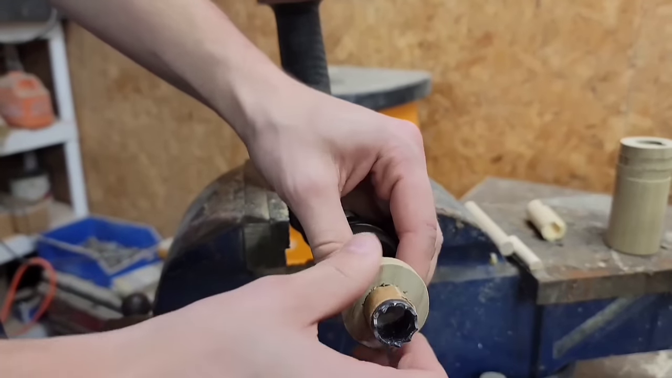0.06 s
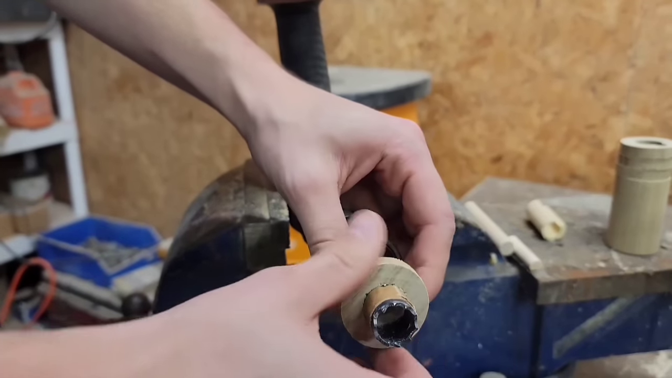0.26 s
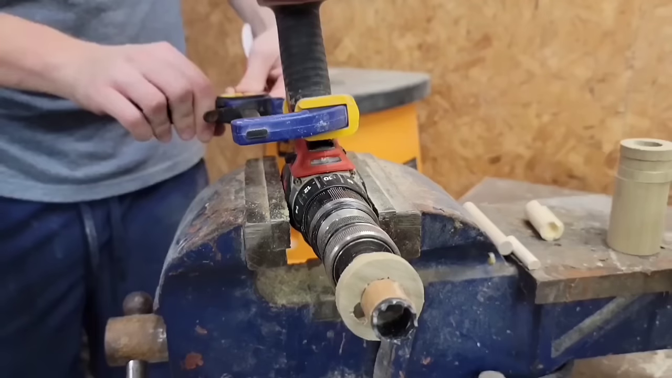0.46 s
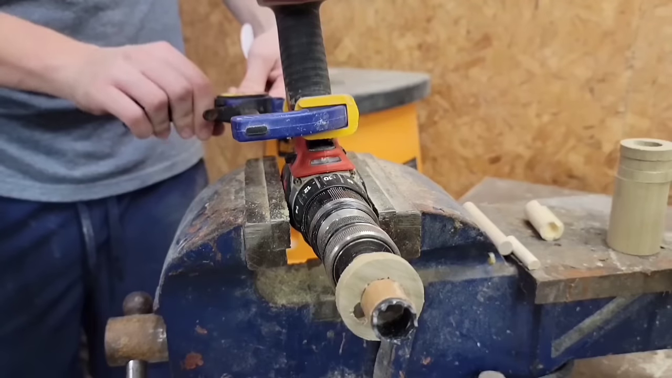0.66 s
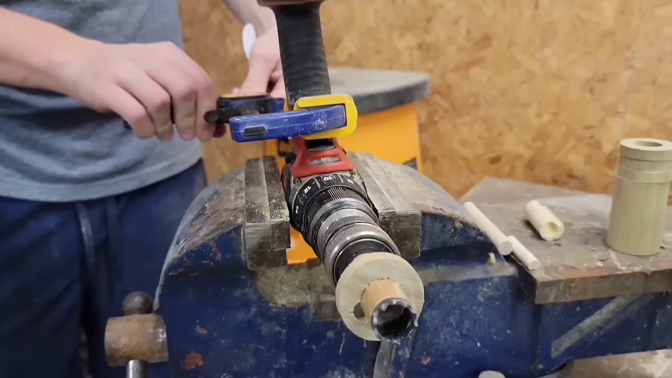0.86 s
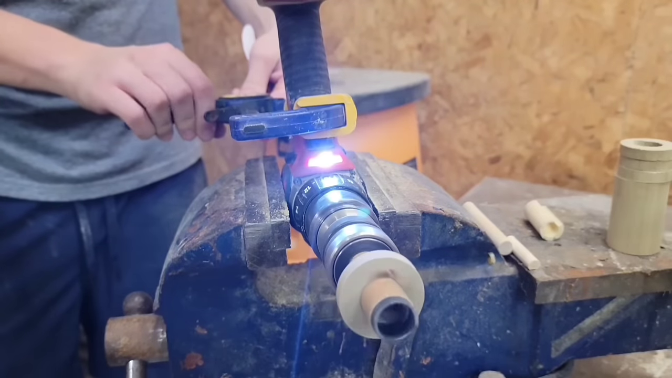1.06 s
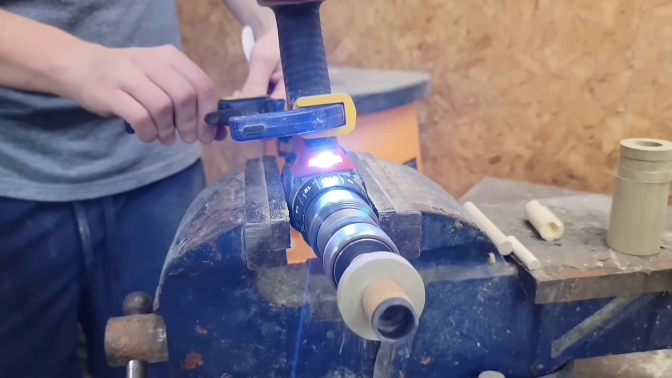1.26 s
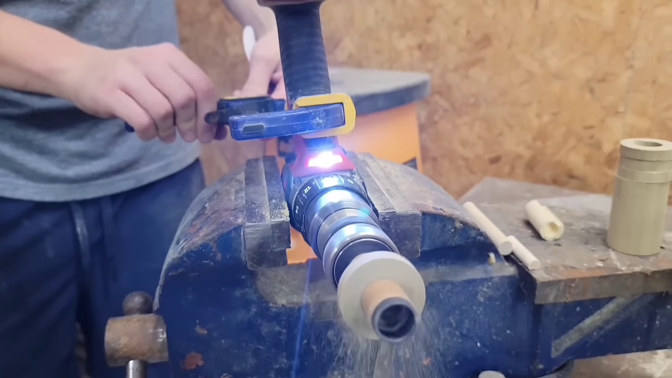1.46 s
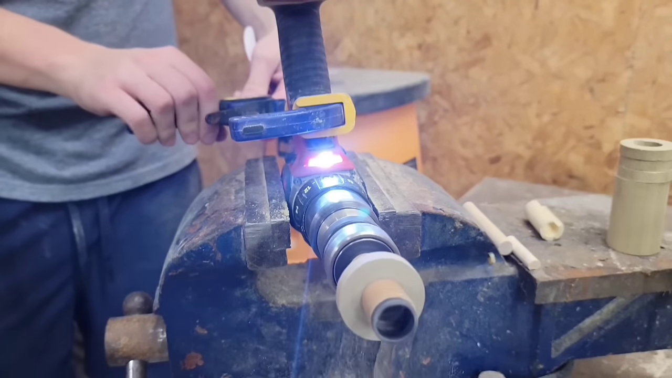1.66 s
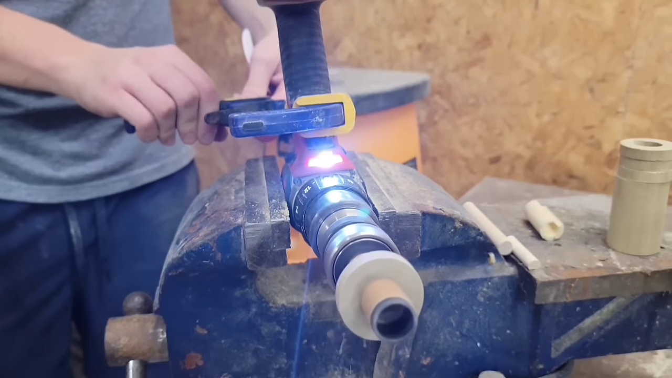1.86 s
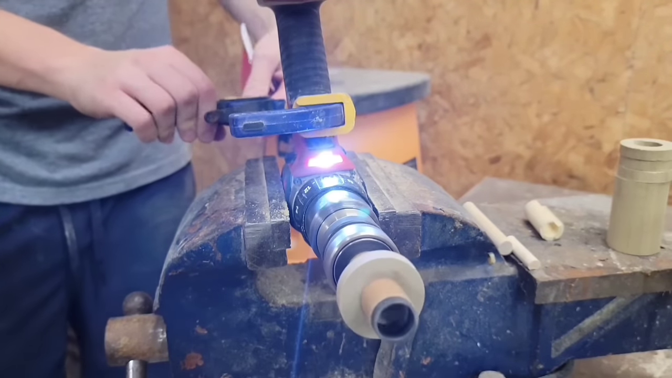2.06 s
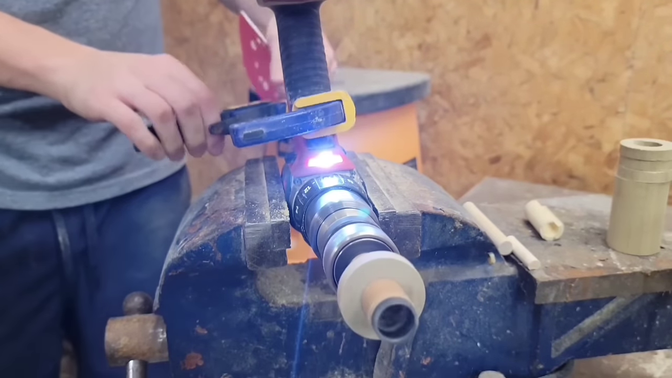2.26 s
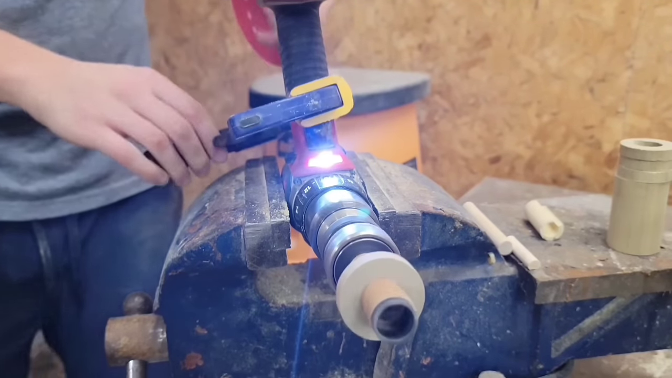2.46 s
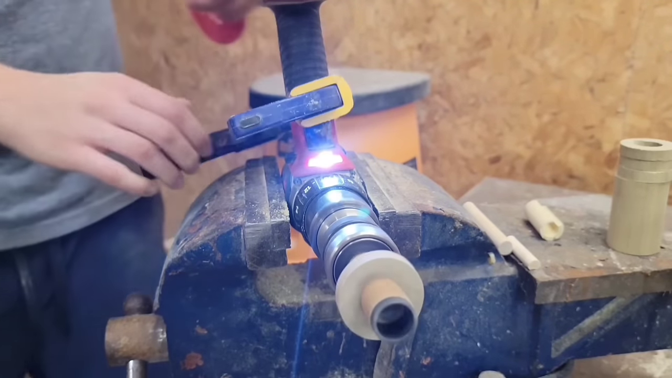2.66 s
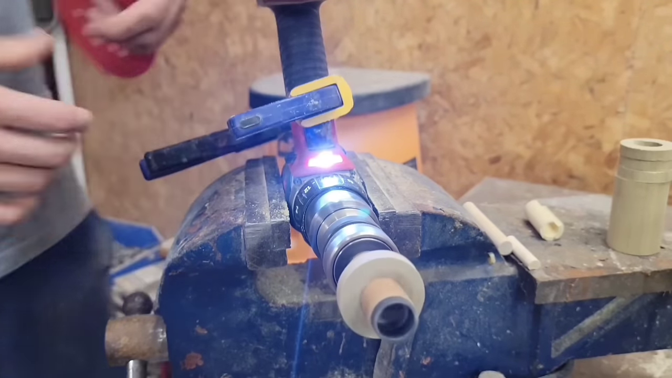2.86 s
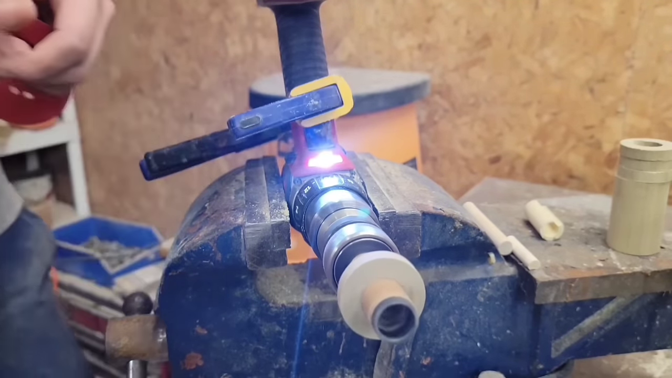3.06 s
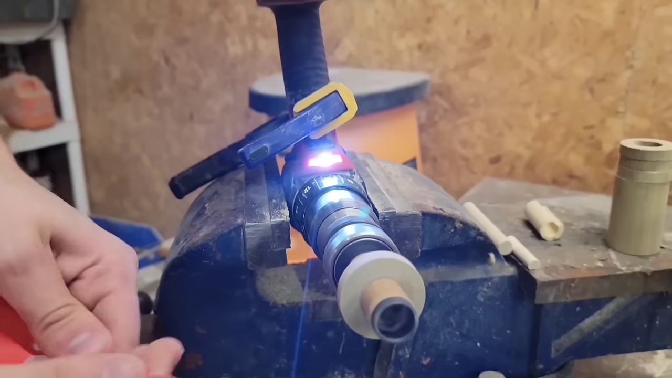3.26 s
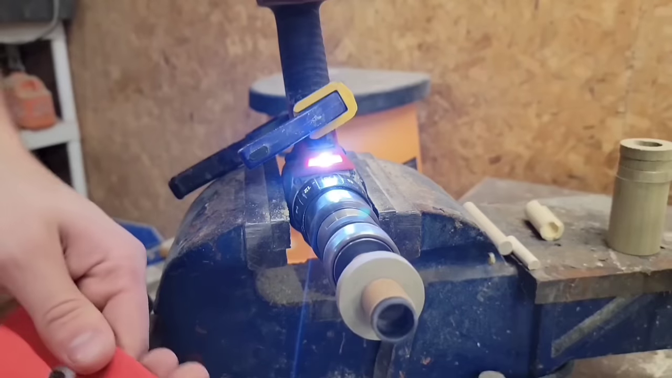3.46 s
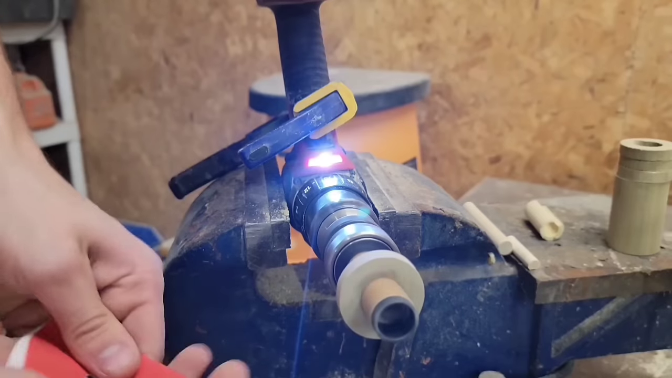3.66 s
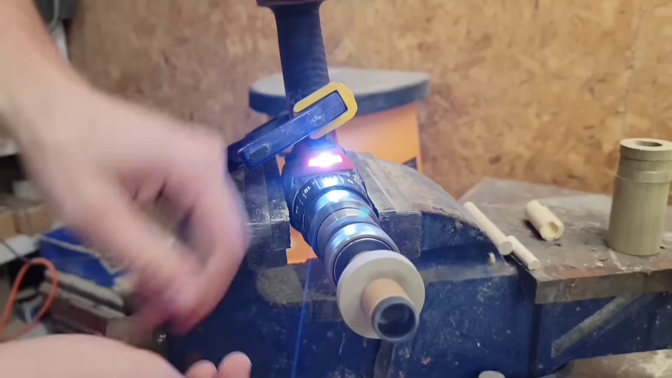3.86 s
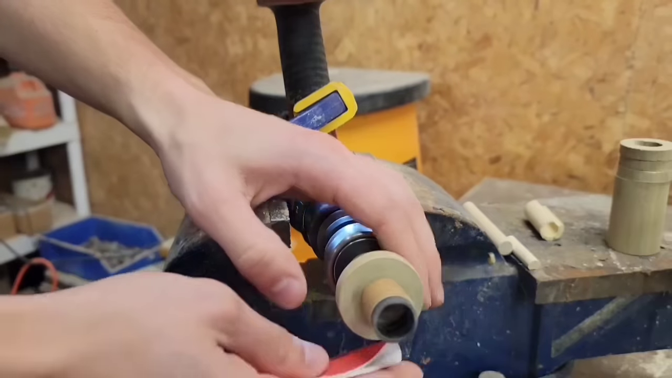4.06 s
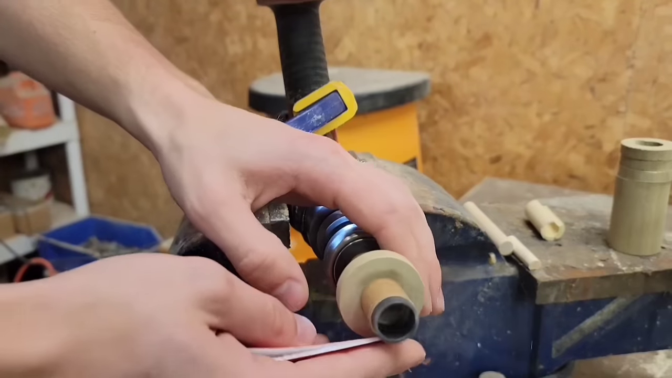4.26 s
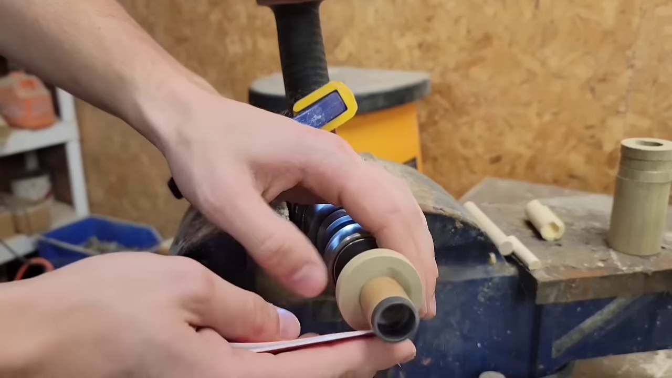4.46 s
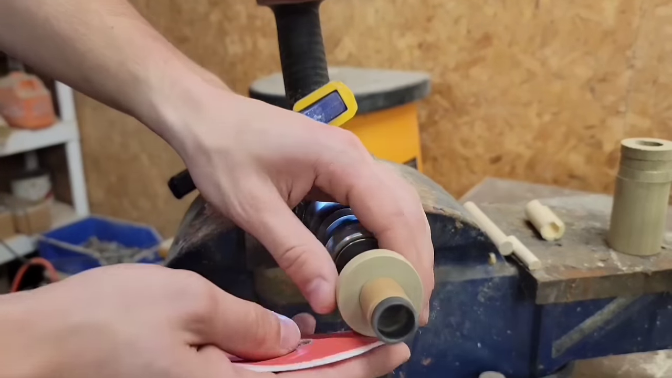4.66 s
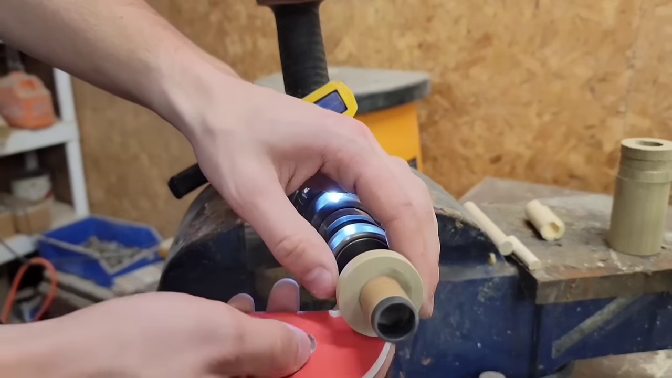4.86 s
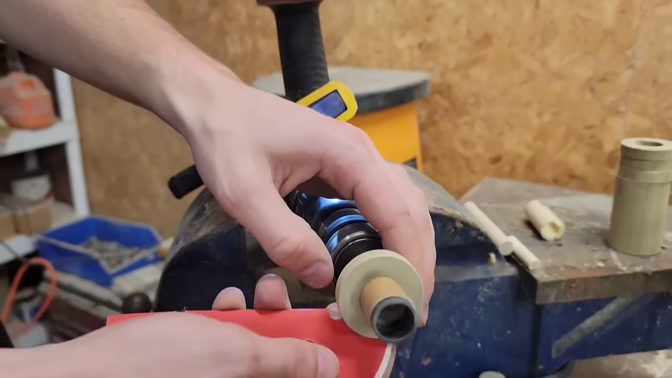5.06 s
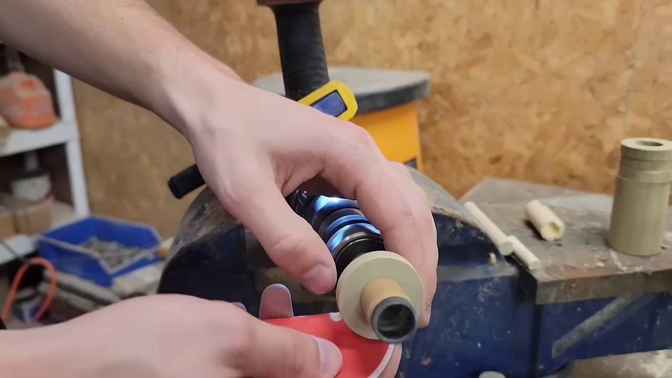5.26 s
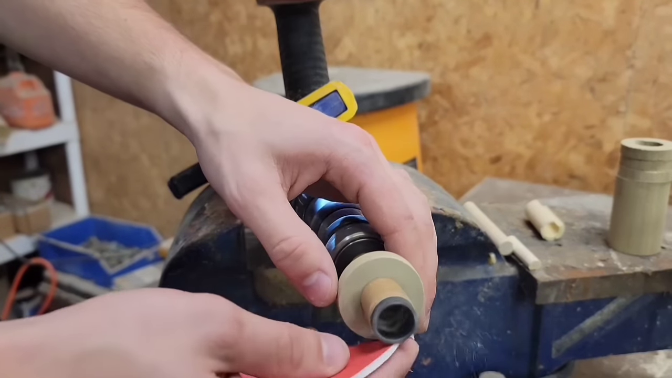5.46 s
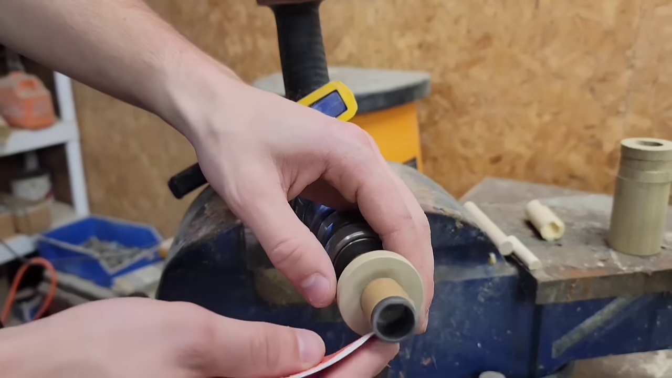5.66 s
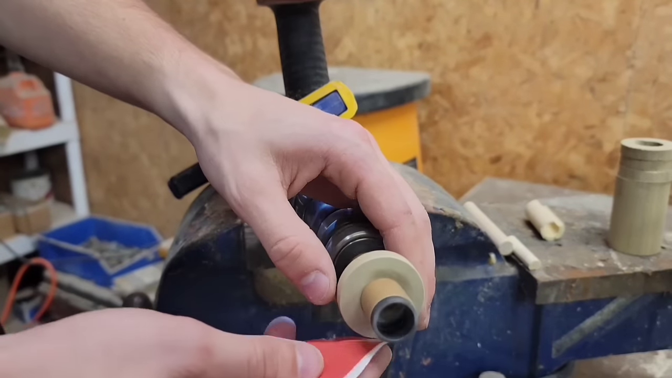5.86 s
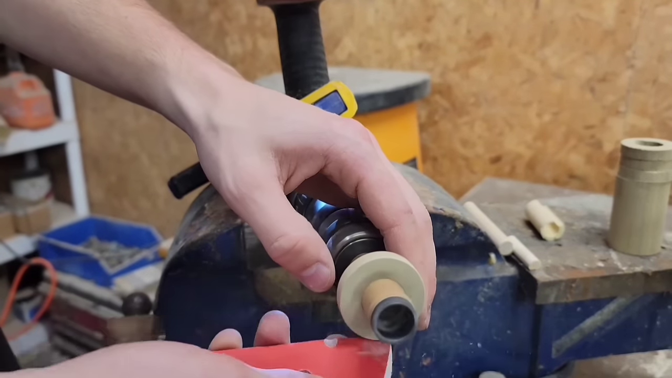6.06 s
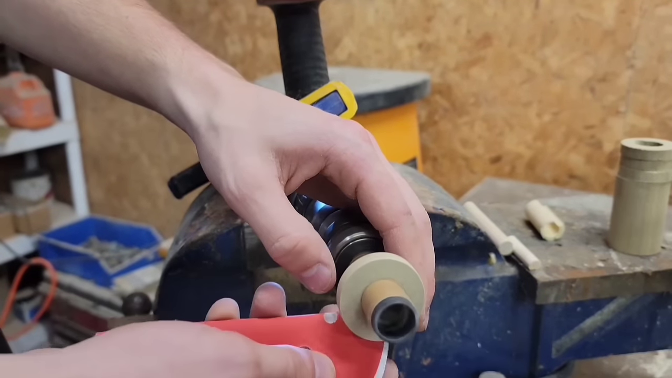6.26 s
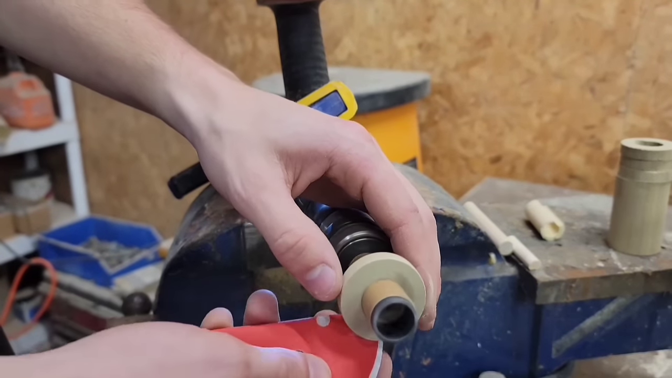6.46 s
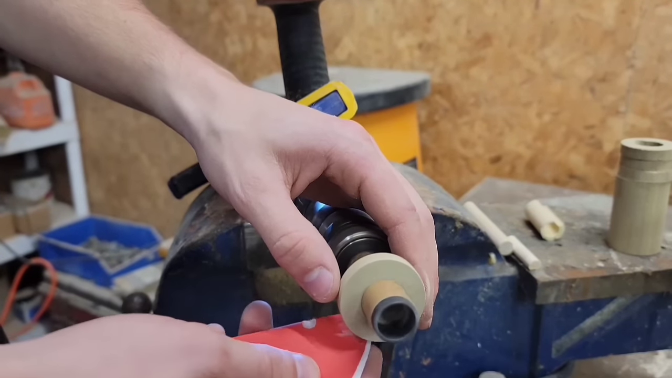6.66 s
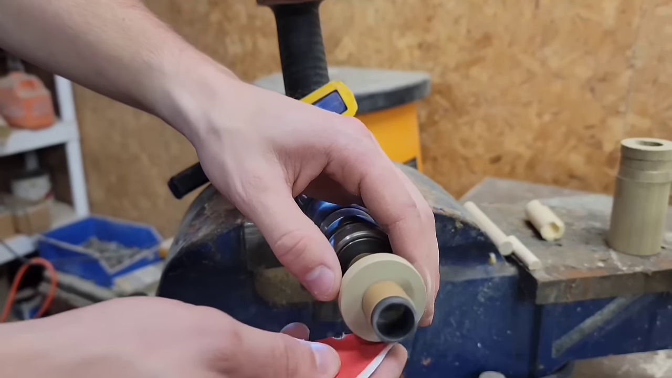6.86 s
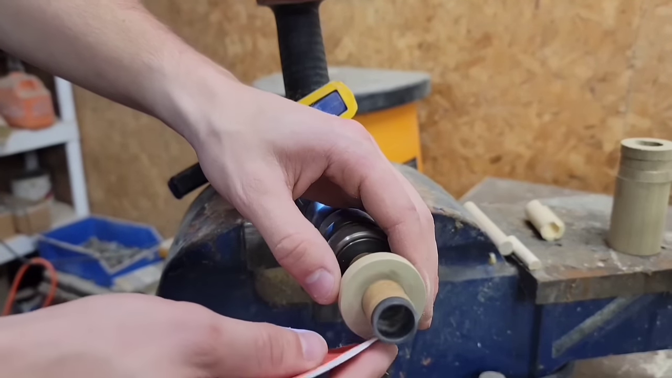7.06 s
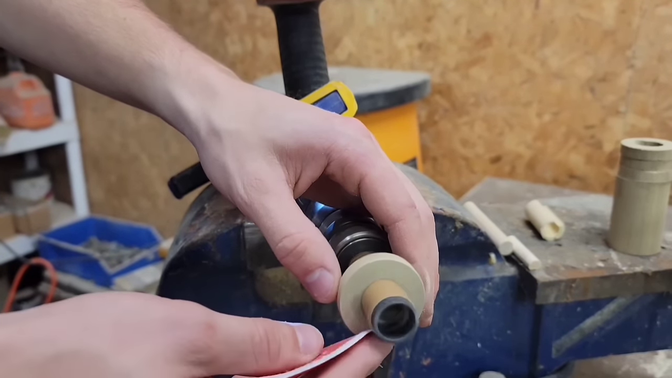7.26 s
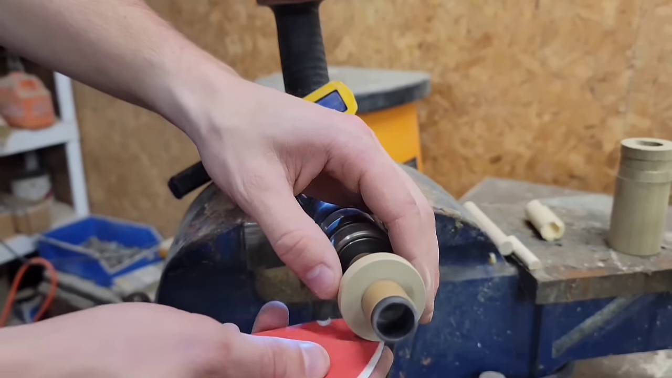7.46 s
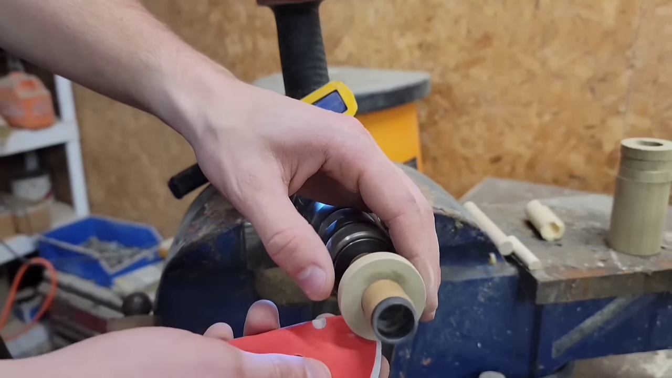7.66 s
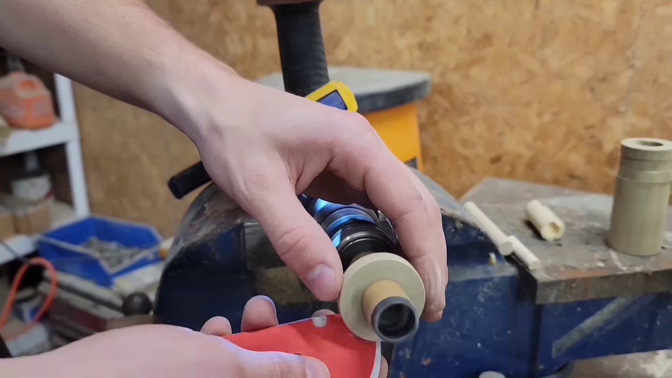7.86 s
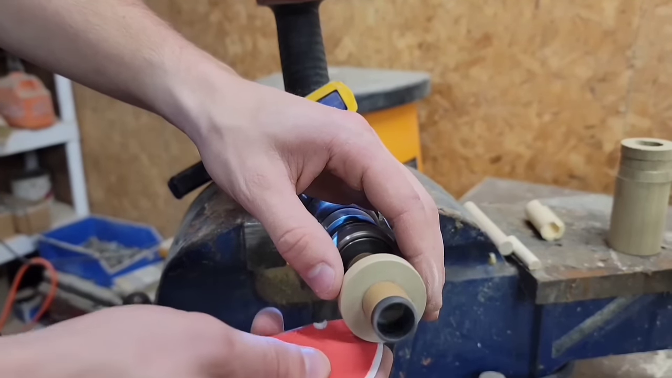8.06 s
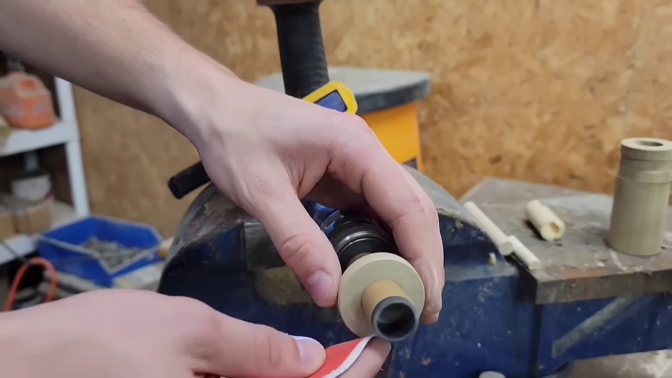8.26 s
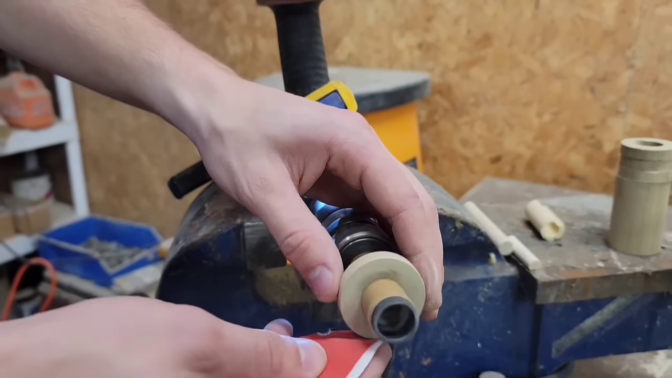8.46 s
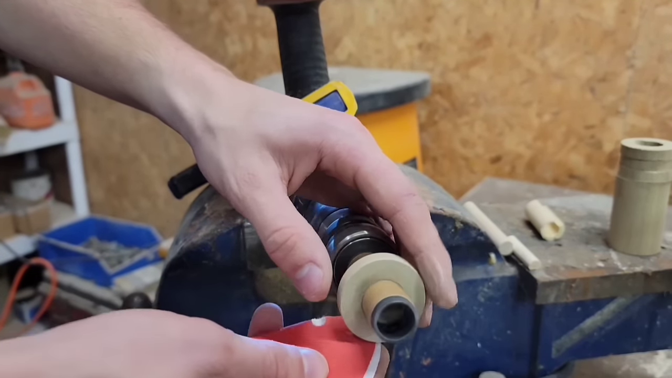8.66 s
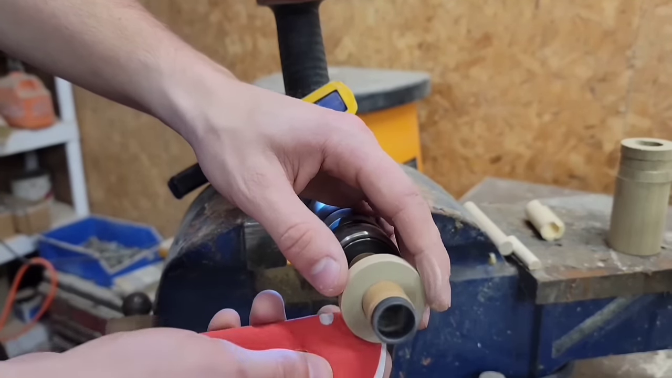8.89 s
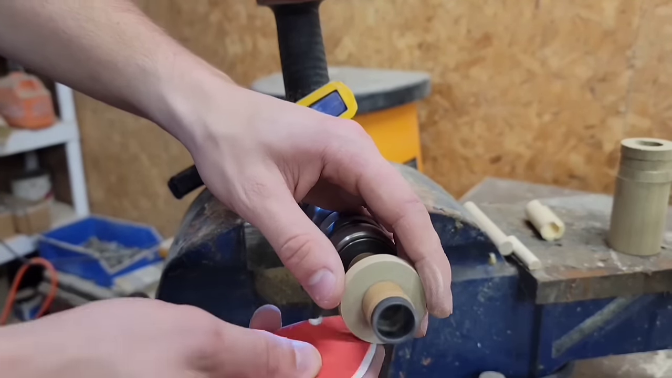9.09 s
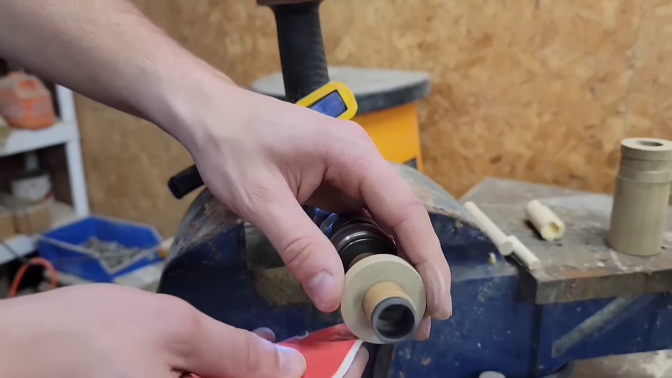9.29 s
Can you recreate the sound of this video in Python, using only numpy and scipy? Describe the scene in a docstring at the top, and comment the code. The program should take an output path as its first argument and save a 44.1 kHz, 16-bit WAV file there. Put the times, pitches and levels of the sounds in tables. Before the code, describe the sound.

The opening is almost silent until 0.3 s, when faint rubbing, soft vise thumps and tiny plastic clicks begin; sharper clacks come around 0.65-0.75 s and 0.9 s. At about 0.87 s the drill motor creeps up with rough gliding tones under a thin, very high fixed-pitch whistle that swells until 1.25 s. Then it surges sharply, reaching full speed by about 1.4 s: a bright whine near 2.8 kHz, low hum, gear rattle, brush buzz and airy hiss, all slightly wavering. At 3.05 s a tiny dip brings a slightly lower, shifted chord with a stronger whine. Another brief dropout at 3.8 s leads to a slightly softer drill. From 4.1 s sandpaper touches the spinning wood, with irregular rasps and hissy scratches, clustered until 6.8 s and again from 7.35 s, softer towards the end. A dull hand knock lands near 9.05 s; the drill keeps running. Close, dry stereo.

```python
"""Clicks and rubbing of a clamp on a trigger, then a cordless drill in a vise spinning a wooden dial.
The motor creeps up under its whistling speed control, surges and runs flat out, then turns slightly
slower with a shifted chord. A hand covers the drill and sandpaper rasps on the turning wood.
Rotor-locked sines make the tones; shaped noise makes gears, air, sandpaper and rubbing; ringing modes make clacks."""
import sys
import numpy as np
from scipy import signal
from scipy.fft import rfft, irfft, next_fast_len
from scipy.io import wavfile

SR = 44100
rng = np.random.default_rng(int(sys.argv[2]) if len(sys.argv) > 2 else 0)


def to_wav(s):
    """Save 16-bit WAV."""
    ch = np.atleast_2d(s).T  # columns
    pcm = np.round(np.clip(ch, -1, 1) * 32767)  # PCM
    wavfile.write(sys.argv[1], SR, pcm.astype(np.int16))


N = 411453

CREEP_S, FULL_S, LATER_S, COVERED_S = .87, 1.245, 3.045, 3.8
SETTLED_S = LATER_S  # table name for the instant the chord shifts; the speed still wavers
WHINE_ORDER = 10  # multiple of the rotor speed
CHOPPER_HZ, CHOPPER_START_DB, CHOPPER_RISE_DB_PER_S, CHOPPER_LEAD_S = 7756, -76.5, 18, .014
CLACK_FALL_DB_PER_OCTAVE, CLACK_RISE_S = 12, .00076
BRUSHES_RE_AIR_DB, BRUSH_PLAY_TURNS = -10.5, .0032
GEAR_RATIO = 6.37  # rotor turns per spindle turn
CUTOFF_HZ = 15850
WANDER_TURNS_PER_S = .35
GEARS_LAG_S, AIR_LAG_S, OCTAVE_LAG_S = .028, .087, .025
GEARS_BITE_TURNS_PER_S = 65  # gear slack is taken up at this speed
FAN_FULL_TURNS_PER_S = 135  # air grows with speed squared below this
HUM_FULL_TURNS_PER_S = 280
GLIDES_FROM_TURNS_PER_S, GLIDES_FULL_TURNS_PER_S = 99, 106
WHINE_FULL_HZ, WHINE_FADE_HZ = 1950, 75  # whine fades in up to this pitch, over this span below it
WHINE_SWELL_DB, WHINE_SWELLS_PER_S = .66, 8.1
TOUCH_S, TOUCH_RASP_DB, TOUCH_HISS_DB = 4.1, -61.5, -50  # light rest of the sandpaper
PRESS_ATTACK_S, PRESS_RELEASE_S = .018, .054

# Clamp, trigger and first gear clack on the housing [t/s, level/dB, pitch/Hz]
CLACKS = [(.310, -96, 2400), (.368, -96, 1900), (.481, -89, 2800), (.498, -94, 1300), (.522, -97, 1500),
          (.639, -85, 2600), (.670, -66, 3400), (0.7328, -69, 2450), (.744, -76, 2450), (.754, -83, 1100),
          (.897, -68, 2400), (.912, -58, 1400)]
# Ringing modes of the plastic housing [f/Hz, level/dB, t60/s]
HOUSING_MODES = [(1266, 1.5, 0.039), (1990, -3, .045), (2500, 0, 0.043), (2670, -3, 0.052),
                 (3500, -4, 0.034), (4870, -13, .05), (7160, -4, .04)]
# Fingers and clamp rubbing on the housing [t/s, length/s, level/dB]
RUBS = [(.300, 0.042, -97), (0.4, .1, -97), (.455, 0.027, -98), (.633, .032, -87), (.68, 0.054, -98),
        (0.726, 0.03, -87), (.77, 0.094, -98), (.862, .04, -83)]
# Dull knocks of the drill body: starting kick, hand [t/s, level/dB, t60/s]
BODY_BUMPS = [(.918, -63.5, 0.66), (9.06, -50.5, 0.12)]
# Soft thumps of the vise [t/s, level/dB, t60/s]
VISE_THUMPS = [(.312, -101, .2), (.43, -99, .25), (.495, -95, .15), (.66, -100, .2), (.735, -96, .15),
               (.804, -89, 0.16)]

# Noise spectra [f/Hz, density/dB per Hz]: rubbing, body knock, vise thump
RUB_SPECTRUM = [(40, -14), (120, -3), (250, -8), (700, -2.5), (1300, -3), (2600, 0), (4500, -6.5),
                (9000, -17), (16000, -25)]
BUMP_SPECTRUM = [(30, -20), (80, -17), (160, -2), (280, -2), (450, 11), (800, -25), (16000, -90)]
THUMP_SPECTRUM = [(30, -24), (90, 2), (140, -4), (300, -24), (2000, -60)]
# Gear rattle and fan air [f/Hz, density/dB per Hz]
GEAR_SPECTRUM = [(25, -47), (50, -38), (70, -16), (90, -22), (125, -15.5), (160, -21.5), (200, -14),
                 (240, -15), (400, -8), (490, 1), (620, -6), (700, -0.5), (920, -1.5), (1050, 0.5),
                 (1300, 2), (1450, 0.5), (1580, -7), (1950, -2), (2550, -5.5), (3050, -6.5), (3450, -2),
                 (3750, -9), (4100, -2.5), (4450, -14), (5000, -5.5), (8000, -22)]
AIR_SPECTRUM = [(500, -27.5), (2500, -15), (4400, -2.5), (5600, 1), (7500, -0.7), (9500, -4.5), (11000, -3),
                (12500, 0.5), (14000, 5.2), (16000, 3.5)]
# Strength of the brush-buzz lines at 280 turns/s [f/Hz, level/dB]
BRUSH_SPECTRUM = [(1600, -7.5), (3500, -6), (5600, -2.5), (8000, -7), (10500, -5), (12500, -2), (15500, -1)]
# Coarse and fine sandpaper noise [f/Hz, density/dB per Hz]
RASP_SPECTRUM = [(300, -18.5), (1500, -12), (3000, -7.5), (4400, -13.5), (5200, 2.5), (7200, 4.5),
                 (8500, -1), (10500, -16), (16000, -27)]
HISS_SPECTRUM = [(5000, -59), (10000, -9), (11500, -8), (12500, 0.5), (14000, -0.5), (16000, 0)]
# Stereo width of all noises [f/Hz, side re mid/dB]
NOISE_WIDTH = [(60, -18), (110, -13), (200, -45), (380, 2), (700, 2), (1290, 0), (2380, -1.5), (4400, 2),
               (8120, -0.5), (15000, 1)]
# Direction of drill and sandpaper noise [f/Hz, left re right/dB]
DRILL_SIDE = [(100, 0), (700, 0), (4000, 1), (6000, 3), (10000, 2), (12500, -5), (16000, -0.5)]
PAPER_SIDE = [(1000, 1), (4000, 24.5), (6000, 6.5), (8500, 11), (11000, -1.5), (14000, 2)]

# Rotor speed it heads for: start, clamp tightening, full throttle [t/s, speed/turns per s, lag/s]
THROTTLE = [(CREEP_S, 102, .045), (.985, 156, .33), (FULL_S, 281.4, .059)]
# Speed once running, wavering slightly, a little slower after 3.05 s [t/s, speed/turns per s]
RUNNING_SPEED = [(1.55, 279.9), (1.62, 281.8), (1.95, 281.7), (2.22, 279.2), (2.5, 282), (2.65, 279.5),
                 (2.83, 282.2), (3.03, 280.9), (3.05, 277.5), (3.35, 274.5), (3.75, 275.7), (4.4, 274.9),
                 (6.0, 274.7), (6.3, 276.3), (6.45, 274.8), (6.65, 275.0), (6.8, 273.1), (7.0, 275.5),
                 (7.65, 273.9), (7.8, 275.9), (7.95, 274.0), (8.5, 274.5), (9.0, 274.8), (9.3, 273.0)]
# Drill stages [t/s, gear level/dB, air level/dB, whine-octave change/dB]; hand on in the last three
STAGES = [(CREEP_S, -68, -57, 0), (.912, -61.3, -55.5, 0), (1.268, -51.5, -46, 1), (1.3, -52, -45, -2),
          (SETTLED_S, -52.5, -46, 5.9), (COVERED_S, -53.5, -48.5, 0), (4.5, -54, -47.5, 0),
          (8, -53.5, -47.5, -11)]
# Throb of the planet gears [rate/beats per rotor turn, depth/1]
GEAR_BEATS = [(.0697, .06), (.1066, .075), (.131, .055), (.157, .04), (.1895, .05)]

# Motor and gear lines, before gain offsets and swells: creeping, surging, flat out, later
# [order/multiple of speed, level/dB, left re right/dB, left lead/rad]
CREEPING_TONES = [(4, -82, 0, 0), (10, -61.5, 0, .6), (11, -72, 0, 1), (15, -73, 0, 0), (20, -65, 0, .8),
                  (30, -72, 0, 0), (60, -79, 0, 0), (70, -82, 0, 0)]
SURGING_TONES = [(1, -78, 0, 0), (2, -76, 0, 0), (3, -75, 0, 0), (5, -61.5, 0, .5), (30, -64.5, 0, 1),
                 (40, -63.5, -2, .1), (50, -66, -3, 1)]
FAST_TONES = [(0.25, -85, -2, 0.3), (1.79, -73.0, 2, -0.2), (2, -69, -6, -2.0), (3, -70.5, 5, -1.7),
              (3.73, -72.1, 2, -1.3), (4, -63.5, -2, 0.5), (5, -65.0, -7, 0.9), (5.25, -74.2, 1, 1.5),
              (6, -64.2, 6, 0.6), (7, -72.5, -6, -0.1), (8, -66.3, 2, 0.7), (11, -70.0, 0, -2.6),
              (13, -72.3, -8, -1.0), (15, -61.9, -1, -1.3), (20, -65.3, 4, -2.8), (30, -67.0, -1, 1.9),
              (31, -69.7, 3, -2.7), (40, -64.9, -2, 0.1), (45, -63, -6, -0.1), (50, -64, -4, 1.0)]
LATER_TONES = [(1.79, -75.5, 6, 0.6), (2, -65.4, 5, 2.1), (3, -73.4, 4, 2.2), (3.27, -75.5, 6, -0.3),
               (4, -64.3, 3, 0.6), (5, -60.9, -2, 0.1), (6, -74.3, 6, 1.3), (7, -75.5, 2, -0.6),
               (8, -70, 7, 0.3), (13, -69.8, 4, 3.0), (15, -63.3, 4, 0.1), (20, -66.9, 5, 2.2),
               (30, -62.2, 5, -0.4), (31, -72.5, 8, 1.7), (40, -62.7, 3, 2.9), (45, -65, -4, -2.6),
               (49, -65.1, -2, -0.0), (50, -58.6, -2, -1.3)]
# Housing response to gliding lines [f/Hz, gain/dB]
GLIDE_RESPONSE = [(1020, -15), (1090, -0.5), (1170, -0.5), (1205, -10), (1260, 2), (1340, 4), (1500, -6),
                  (1980, -3), (2130, -1), (2480, -3), (3100, -14), (3500, -7), (3700, 7), (3900, -8),
                  (4600, -10), (6600, -5), (7500, 3), (8600, -8), (10000, 2), (12000, -4)]
# Changes of the later lines until the hand covers the drill [order/multiple of speed, change/dB]
UNCOVERED_CHANGES = [(4, -1.5), (5, -2), (6, 6), (30, -6.5), (50, -8)]
# Thin whistle two octaves above the whine [t/s, change/dB]
WHISTLE_CHANGE = [(1.45, 0), (1.53, -5), (1.72, 3), (2.02, 2), (2.15, -7), (2.38, -7), (2.48, 4),
                  (2.62, -8), (2.88, 1.5), (3.02, -4), (3.12, 6), (3.35, 0), (3.55, 5), (3.75, -1),
                  (4.15, -1), (6.9, -1), (7.8, 1), (9.3, -2)]
# Upper whine, a fifth above the main one [t/s, change/dB]
UPPER_WHINE_CHANGE = [(1.55, -2), (1.93, 2), (2.04, -7), (2.15, 1), (2.28, -6), (2.47, 3), (2.65, -6),
                      (2.9, 2), (3.12, -5), (3.3, -2), (3.95, 0), (8, 0)]
# Low rumble, one beat in four rotor turns [t/s, change/dB]
RUMBLE_CHANGE = [(1.55, -6), (1.66, 8), (1.8, -8), (2.15, -5), (2.3, 7), (2.7, 3), (2.85, -6)]
# Once-per-turn hum [t/s, level/dB]
HUM_LEVEL = [(1.0, -95), (1.24, -82), (1.32, -79), (1.4, -70), (1.52, -62), (1.65, -65), (2.1, -62.5),
             (2.35, -65.5), (3.0, -64), (3.1, -61.5), (8, -61)]
# Main whine [t/s, level/dB, left re right/dB]
WHINE_LEVEL = [(1.283, -55, 0), (1.31, -70, 0), (1.335, -57, 0), (1.365, -40, 2), (1.42, -52.5, -1),
               (1.55, -56.5, -2), (1.75, -58, -4), (1.95, -56, 0), (2.12, -57.5, 7), (2.25, -55.5, 2),
               (2.7, -55.5, 0), (2.98, -57.5, 6), (3.1, -53, -0.5), (3.55, -52.5, 0), (3.95, -54, -0.5),
               (4.4, -53, -3), (5.95, -52.5, -3.5), (6.1, -55.5, 0), (6.6, -54, -1), (8.3, -52.5, -2.5),
               (9.15, -52.5, -1), (9.3, -54, 1)]
# Sway of the whine between the ears [t/s, left lead/rad]
WHINE_LEAD = [(1.45, 2.4), (1.7, 1.8), (1.75, 2.7), (1.95, 1.2), (2.05, 2.8), (2.15, 2), (2.3, 3.1),
              (2.75, 2.4), (3.15, 2.5), (3.25, 1.36), (3.35, 2.75), (3.7, 3.0), (3.9, 2), (3.95, 2.7),
              (4.2, 2.1), (4.3, 2.9), (4.4, 1.7), (4.45, 2.66), (5.25, 3.26), (6.25, 2.64), (6.55, 3.04),
              (6.85, 1.3), (6.98, 4.3), (7.3, 2.85), (7.7, 2.45), (7.88, 3.0), (8.0, 2.5), (8.15, 2.4),
              (8.2, 1.7), (8.4, 2.9), (8.6, 2.45), (8.9, 2.6), (9.3, 2.1)]

# Sandpaper presses [t/s, length/s, rasp level/dB, hiss level/dB]
PRESSES = [(4.116, 0.12, -53, -60), (4.566, 0.048, -50.5, -51), (4.678, 0.19, -53, -55),
           (4.918, 0.13, -55.5, -47), (5.004, 0.076, -63, -40.5), (5.294, 0.069, -52.5, -50),
           (5.784, 0.48, -55.5, -50.5), (6.253, 0.13, -51, -46), (6.385, 0.17, -56.5, -47),
           (6.654, 0.15, -55, -44.5), (7.35, 0.17, -57, -49), (7.504, 0.21, -63, -56),
           (7.788, .11, -57, -48), (8.024, 0.054, -54, -46), (8.348, 0.41, -61, -51.5),
           (8.713, 0.41, -61, -53)]
# Brief dips of the whole level [t/s, length/s, depth/dB]
LEVEL_DIPS = [(3.045, .007, -9), (3.788, .016, -26)]


def from_db(db):
    """Decibels to amplitude gain."""
    return 10 ** (np.asarray(db) / 20)


def rms_one(x):
    """Scale to unit rms."""
    return x / np.sqrt(np.mean(x ** 2) + 1e-20)


def at_hz(points, hz):
    """Read a curve on a log-frequency axis."""
    f, value = np.transpose(points)
    return np.interp(np.log(hz + 1e-6), np.log(f), value)


def in_time(rows):
    """Join points of (s, value) by straight lines."""
    return np.interp(np.arange(N) / SR, *np.transpose(rows))


def drift(rate_hz, at=np.arange(N)):
    """Slow random curve of rms 1 at about rate_hz, read at the given samples."""
    pole = np.exp(-80 * np.pi * rate_hz / SR)  # computed at every 40th sample
    white = rng.standard_normal(N // 40 + 2002)
    slow = signal.lfilter([1], [1, -2 * pole, pole * pole], white)[2000:]
    return np.interp(at / 40, np.arange(len(slow)), rms_one(slow))


def eased(rows):
    """From zero, approach each value exponentially; rows of (s, value, lag s)."""
    out = np.zeros(N)
    for s, value, lag_s in rows:
        i = int(s * SR)
        decay = np.exp(-np.minimum(np.arange(N - i) / SR / lag_s, 50))
        out[i:] = value + (out[i] - value) * decay
    return out


def held(s, length_s, attack_s, release_s):
    """Envelope that rises, holds and dies away."""
    age_s = np.maximum(np.arange(N) / SR - s, 0)
    release = np.exp(-np.clip((age_s - length_s) / release_s, 0, 50))
    return (1 - np.exp(-age_s / attack_s)) * release


def blows(rows, rise_s):
    """Summed envelopes that rise fast and decay by 60 dB in t60."""
    out = np.zeros(N)
    for s, db, t60_s in rows:
        age_s = np.maximum(np.arange(N) / SR - s, 0)
        decay = np.exp(-np.minimum(np.log(1000) * age_s / t60_s, 50))
        out += from_db(db) * (1 - np.exp(-age_s / rise_s)) * decay
    return out


def noise(spectrum, direction, excitation=1):
    """Stereo noise, modulated by its excitation, then coloured and placed; rms 1."""
    size = next_fast_len(N)
    hz = np.arange(size // 2 + 1) * SR / size
    mid, side = rfft(rng.standard_normal((2, N)) * excitation, size)
    width = from_db(at_hz(NOISE_WIDTH, hz))
    pair = (mid + side * width * [[1], [-1]]) / np.hypot(1, width)
    gain = from_db(at_hz(spectrum, hz) + at_hz(direction, hz) * [[.5], [-.5]])
    return rms_one(irfft(pair * gain, size)[:, :N])


def hands(slip_db=3.5):
    """Friction sticks and slips, clacks ring the housing, body and vise knock dully."""
    rubbing = sum(from_db(db) * held(s, length_s, attack_s=.006, release_s=.012)
                  for s, length_s, db in RUBS)
    rubs = rubbing * noise(RUB_SPECTRUM, DRILL_SIDE, from_db(slip_db * drift(140)))
    bumps = blows(BODY_BUMPS, rise_s=.011) * noise(BUMP_SPECTRUM, DRILL_SIDE)
    thumps = blows(VISE_THUMPS, rise_s=.004) * noise(THUMP_SPECTRUM, DRILL_SIDE)
    return rubs + clacks() + bumps + thumps


def clacks(spread_db=2, crack_db=-1, crack_t60_s=.025):
    """A short crack sets the housing modes ringing, those near its own pitch most strongly."""
    out, age_s = np.zeros((2, N)), np.arange(SR // 4) / SR
    for s, db, pitch_hz in CLACKS:
        start = int(s * SR)
        for hz, mode_db, t60_s in HOUSING_MODES:
            fall_db = CLACK_FALL_DB_PER_OCTAVE * abs(np.log2(hz / pitch_hz))
            gain = from_db(db + mode_db - fall_db + rng.normal(0, spread_db, (2, 1)))
            envelope = (1 - np.exp(-age_s / CLACK_RISE_S)) * from_db(-60 * age_s / t60_s)
            ring = np.sin(2 * np.pi * hz * age_s + rng.normal(0, 1, (2, 1)))
            out[:, start:start + len(age_s)] += gain * envelope * ring
    cracks = blows([(s, db + crack_db, crack_t60_s) for s, db, _ in CLACKS], rise_s=.0008)
    return out + cracks * noise(RUB_SPECTRUM, DRILL_SIDE)


def speed_control(octave_db=3):
    """Chopped motor current whistles at a fixed pitch, with its octave, at part throttle."""
    t = np.arange(N) / SR
    level_db = CHOPPER_START_DB + CHOPPER_RISE_DB_PER_S * (np.clip(t, CREEP_S, FULL_S) - CREEP_S)
    gate = held(CREEP_S - CHOPPER_LEAD_S, FULL_S - CREEP_S, attack_s=.012, release_s=.0071)
    angle = 2 * np.pi * CHOPPER_HZ * t + .4 * drift(40)
    whistle = np.sin(angle) + from_db(octave_db) * np.sin(2 * angle)
    return from_db(level_db + drift(30)) * whistle * gate


def stage_levels():
    """Gains of gears and air, and dB change of the whine's octave, eased between stages."""
    starts, gears_db, air_db, octave_db = np.transpose(STAGES)
    gears = eased([(s, gain, GEARS_LAG_S) for s, gain in zip(starts, from_db(gears_db))])
    air = eased([(s, gain, AIR_LAG_S) for s, gain in zip(starts, from_db(air_db))])
    return gears, air, eased([(s, db, OCTAVE_LAG_S) for s, db in zip(starts, octave_db)])


def rattle_and_air(turns, speed, gears_gain, air_gain, beat=.13, rough_db=1.22):
    """Gear teeth rattle and brushes buzz with the rotor, under fan air; planet gears make all throb."""
    pulsing = 1 + beat * np.sin(2 * np.pi * turns)
    throb = 1 + sum(depth * np.sin(2 * np.pi * rate * turns) for rate, depth in GEAR_BEATS)
    biting = np.clip(speed / GEARS_BITE_TURNS_PER_S, 0, 1) ** 3
    rattle = noise(GEAR_SPECTRUM, DRILL_SIDE, pulsing * from_db(rough_db * drift(38)))
    gears = biting * gears_gain * rattle
    rush = noise(AIR_SPECTRUM, DRILL_SIDE, pulsing * from_db(.6 * drift(80)))
    rush = rush + from_db(BRUSHES_RE_AIR_DB) * brushes(turns)
    fan = np.clip(speed / FAN_FULL_TURNS_PER_S, 0, 1) ** 2
    return throb * (gears + air_gain * fan * rush)


def brushes(turns, size=512):
    """Brushes ride the same bumps every turn: an even buzz of rotor multiples; rms 1."""
    orders = np.arange(size // 2 + 1)
    strength = from_db(at_hz(BRUSH_SPECTRUM, orders * HUM_FULL_TURNS_PER_S))
    strength = strength * (orders > 5) * (orders < 58)
    bumps = irfft(strength * np.exp(2j * np.pi * rng.random((2, len(orders)))))
    place = (turns + BRUSH_PLAY_TURNS * drift(27)) % 1 * size
    buzz = [np.interp(place, np.arange(size + 1), np.append(ear, ear[0])) for ear in bumps]
    return rms_one(np.array(buzz))


def motor(turns, speed, octave_db):
    """Rotor-locked lines: rough glides, shrill sweeps, a full chord, then a shifted chord."""
    swells = line_swells(octave_db)
    full = np.clip((speed - 250) / 31, 0, 1) ** 2
    later = np.clip((np.arange(N) / SR - LATER_S) / .015 + .5, 0, 1)
    glide_span = GLIDES_FULL_TURNS_PER_S - GLIDES_FROM_TURNS_PER_S
    slow = np.clip((speed - GLIDES_FROM_TURNS_PER_S) / glide_span, 0, 1)
    slow = slow * np.clip((140 - speed) / 15, 0, 1)
    creeping = tones(CREEPING_TONES, slow, turns, speed, {},
                     waver_db=1, flutter_db=2.5, smear=.018, gain_db=-1.5, gliding=True)
    surging = np.clip((speed - 150) / 50, 0, 1) * (1 - full) * (1 - later)
    sweeps = tones(SURGING_TONES, surging, turns, speed, {},
                   waver_db=1, flutter_db=2, smear=.008, gain_db=0, gliding=True)
    fast = tones(FAST_TONES, full * (1 - later), turns, speed, swells,
                 waver_db=1.4, flutter_db=2, smear=.014, gain_db=-.5)
    shifted = tones(LATER_TONES, later, turns, speed, swells,
                    waver_db=1, flutter_db=1.9, smear=.031, gain_db=0)
    return creeping + sweeps + fast + shifted + hum(turns, speed) + whine(turns, speed)


def tones(table, share, turns, speed, swells, waver_db, flutter_db, smear, gain_db, gliding=False):
    """Rotor-locked sines wavering in level and phase; part of the phase strays separately at each ear."""
    sounding = np.flatnonzero(share)
    on = slice(sounding[0], sounding[-1] + 1)
    out, at = np.zeros((2, N)), np.arange(N)[on]
    for order, db, pan_db, lead_rad in table:
        swell_db = gain_db + waver_db * drift(7.9, at) + flutter_db * drift(30.5, at)
        if order in swells:
            swell_db = swell_db + swells[order][on]
        if gliding:
            swell_db = swell_db + at_hz(GLIDE_RESPONSE, order * np.abs(speed[on]))
        gain = from_db(db + swell_db)
        # order ** 2 staggers the phases; gear play smears high orders most
        angle = 2 * np.pi * order * turns[on] + order ** 2 + smear * order * drift(37, at)
        for channel, sign in enumerate((.5, -.5)):
            stray_rad = .075 * np.sqrt(order) * drift(3, at)
            line = np.sin(angle + sign * lead_rad + stray_rad)
            out[channel, on] += gain * from_db(sign * pan_db) * line
    return np.sqrt(2) * out * share


def line_swells(octave_db):
    """Level changes in dB by order: some lines swell and fade; some change when the hand covers the drill."""
    uncovered = in_time([(LATER_S - .01, 0), (LATER_S, 1), (COVERED_S - .1, 1), (COVERED_S, 0)])
    swells = {order: db * uncovered for order, db in UNCOVERED_CHANGES}
    swells[2 * WHINE_ORDER] = octave_db
    swells[4 * WHINE_ORDER] = in_time(WHISTLE_CHANGE)
    swells[15] = in_time(UPPER_WHINE_CHANGE)
    swells[.25] = in_time(RUMBLE_CHANGE)
    return swells


def tone(order, turns, level_db, pan_db, lead_rad):
    """One rotor-locked sine with level and phase offsets between the ears."""
    sign = np.array([[.5], [-.5]])
    line = np.sin(2 * np.pi * order * turns + sign * lead_rad)
    return np.sqrt(2) * from_db(level_db + sign * pan_db) * line


def hum(turns, speed, slow_flutter_db=7.0):
    """The unbalanced rotor hums once a turn: weak and shaky on the way up, steadier at speed."""
    slow = np.clip(1 - speed / HUM_FULL_TURNS_PER_S, 0, 1)
    level_db = in_time(HUM_LEVEL) + slow_flutter_db * np.sqrt(slow) * drift(39)
    later = in_time([(LATER_S - .02, 0), (LATER_S + .02, 1)])
    running = np.clip(speed / GLIDES_FROM_TURNS_PER_S, 0, 1) ** 2
    return running * tone(1, turns, level_db, -5 + 6 * later, -1 + .4 * later)


def whine(turns, speed, flutter_db=1.76, sway_db=2.5, sway_rad=.2, smear_turns=.0059):
    """Ten pulses a turn; fades in as its pitch rises, then sways between the ears."""
    fade_in = np.clip((WHINE_ORDER * speed - WHINE_FULL_HZ) / WHINE_FADE_HZ + 1, 0, 1)
    level_db = in_time([(s, db) for s, db, _ in WHINE_LEVEL])
    level_db = level_db + WHINE_SWELL_DB * drift(WHINE_SWELLS_PER_S) + flutter_db * drift(37)
    pan_db = in_time([(s, pan) for s, _, pan in WHINE_LEVEL]) + sway_db * drift(12.5)
    lead_rad = in_time(WHINE_LEAD) + sway_rad * drift(12)
    return fade_in * tone(WHINE_ORDER, turns + smear_turns * drift(33), level_db, pan_db, lead_rad)


def pressing():
    """Gains of rasp and hiss: a light touch plus each press, added in power."""
    touch = held(TOUCH_S, N / SR, PRESS_ATTACK_S, PRESS_RELEASE_S)
    rasp_power = (from_db(TOUCH_RASP_DB) * touch) ** 2
    hiss_power = (from_db(TOUCH_HISS_DB) * touch) ** 2
    for s, length_s, rasp_db, hiss_db in PRESSES:
        press = held(s, length_s, PRESS_ATTACK_S, PRESS_RELEASE_S)
        rasp_power = rasp_power + (from_db(rasp_db) * press) ** 2
        hiss_power = hiss_power + (from_db(hiss_db) * press) ** 2
    return np.sqrt(rasp_power), np.sqrt(hiss_power)


def sandpaper(turns, rasp_gain, hiss_gain, grain_db=4.5, unsteady_db=1.5):
    """Grit scratches wood; the off-centre dial presses harder once a spindle turn."""
    wobble = 1 + .35 * np.sin(2 * np.pi * turns / GEAR_RATIO)
    grit = wobble * from_db(unsteady_db * drift(17) + grain_db * rng.standard_normal(N))
    rasp = rasp_gain * noise(RASP_SPECTRUM, PAPER_SIDE, grit)
    return rasp + hiss_gain * noise(HISS_SPECTRUM, PAPER_SIDE, grit)


def scene():
    """One rotor angle drives the tones, the rattle and the sanding."""
    rasp, hiss = pressing()
    gears, air, octave_db = stage_levels()
    starting = np.arange(N) / SR < RUNNING_SPEED[0][0]
    speed = np.where(starting, eased(THROTTLE), in_time(RUNNING_SPEED))
    turns = np.cumsum(speed + WANDER_TURNS_PER_S * drift(5.98)) / SR
    drill = speed_control() + rattle_and_air(turns, speed, gears, air) + motor(turns, speed, octave_db)
    return hands() + drill + sandpaper(turns, rasp, hiss)


def record(dry):
    """The level dips briefly twice, and a steep low-pass cuts the top."""
    t = np.arange(N) / SR
    dip_db = sum(db / (1 + (2 * (t - s) / length_s) ** 4) for s, length_s, db in LEVEL_DIPS)
    low_pass = signal.ellip(12, .1, 80, CUTOFF_HZ, fs=SR, output="sos")
    return signal.sosfilt(low_pass, dry * from_db(dip_db))


dry = scene()
out = record(dry)
to_wav(out)
```